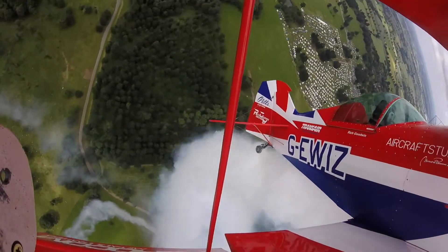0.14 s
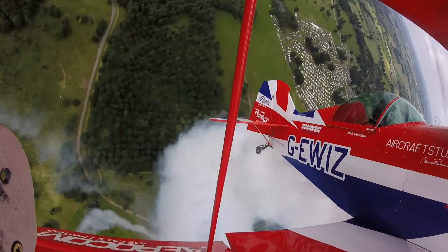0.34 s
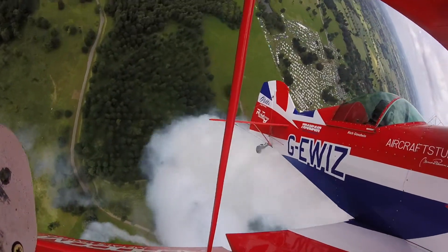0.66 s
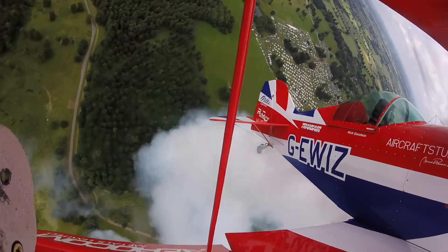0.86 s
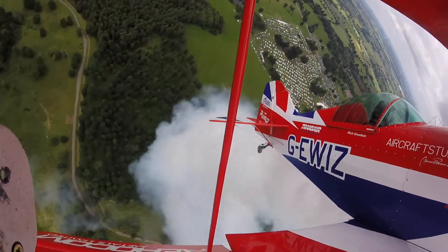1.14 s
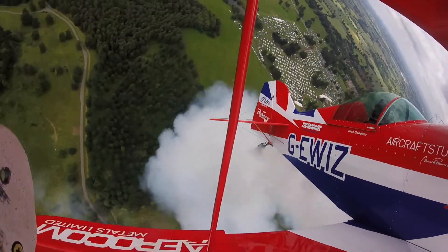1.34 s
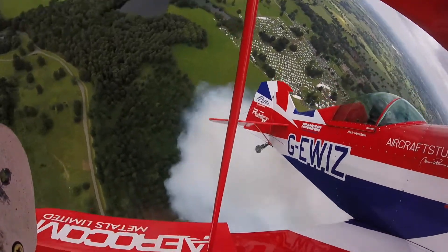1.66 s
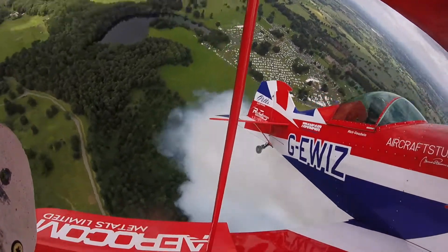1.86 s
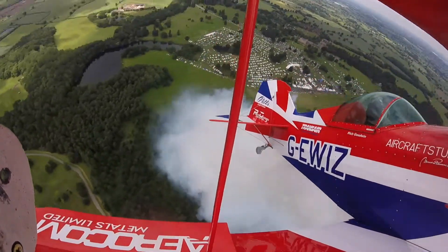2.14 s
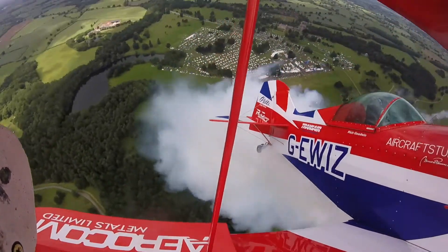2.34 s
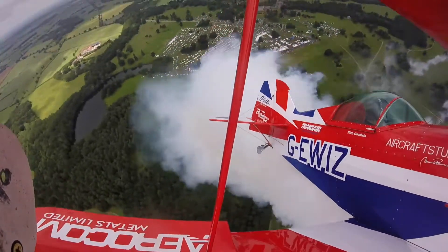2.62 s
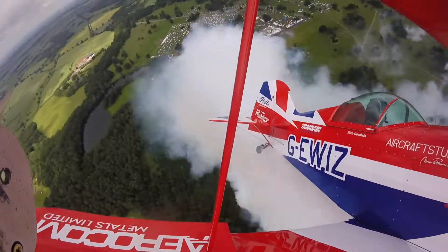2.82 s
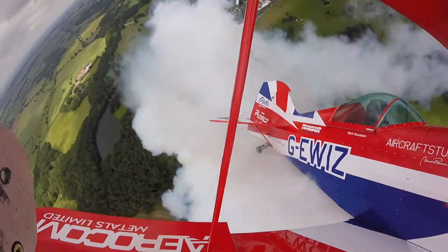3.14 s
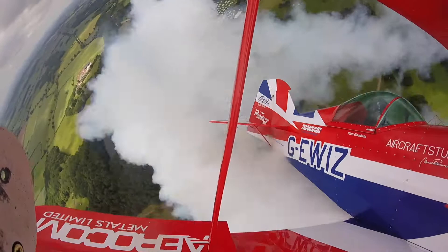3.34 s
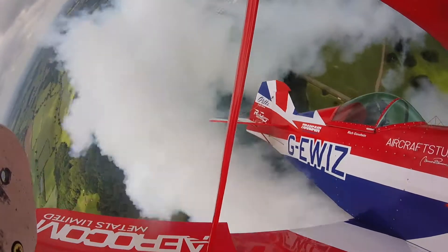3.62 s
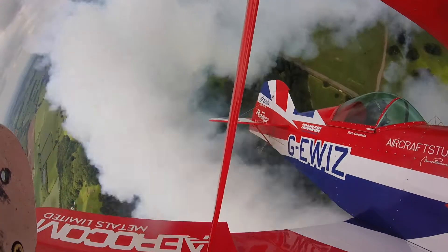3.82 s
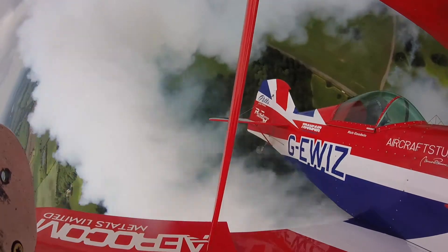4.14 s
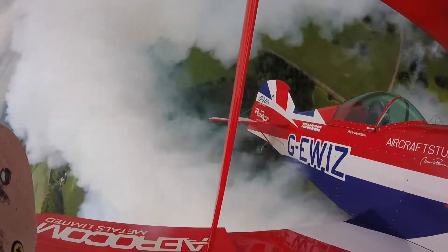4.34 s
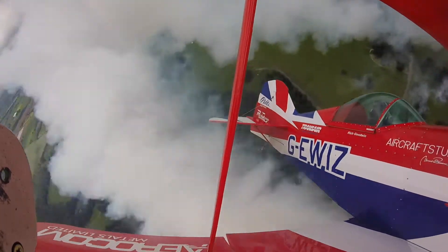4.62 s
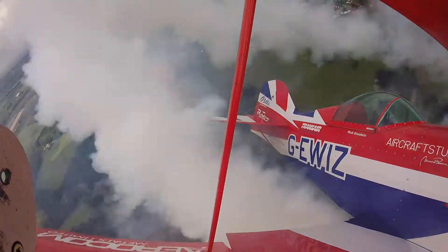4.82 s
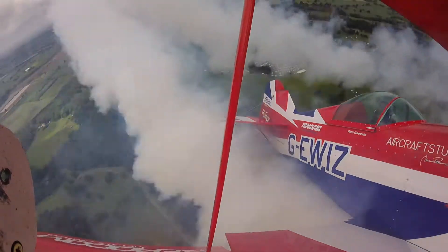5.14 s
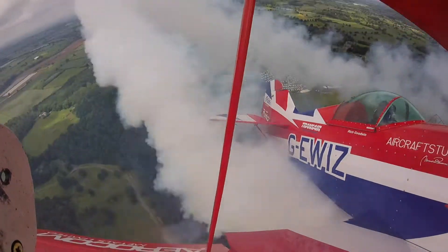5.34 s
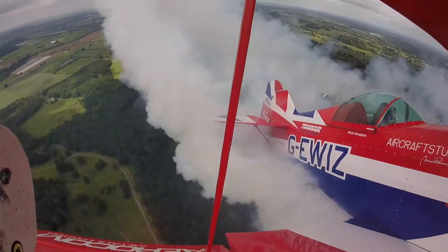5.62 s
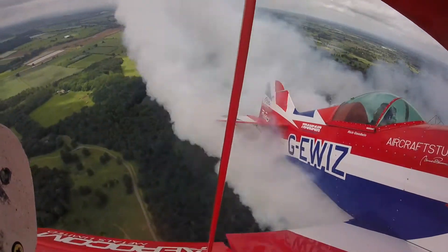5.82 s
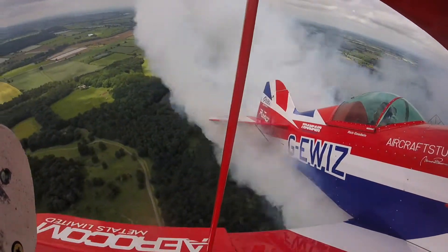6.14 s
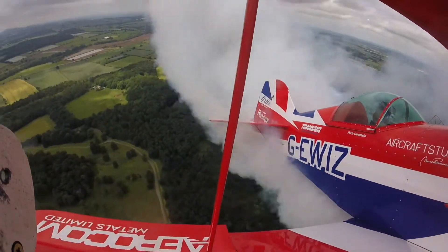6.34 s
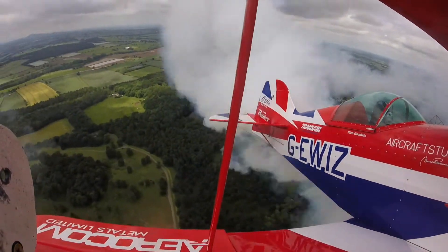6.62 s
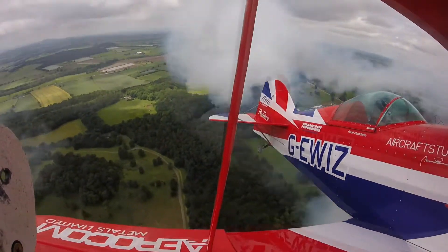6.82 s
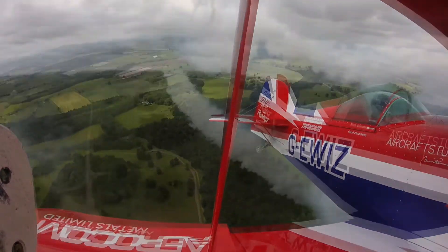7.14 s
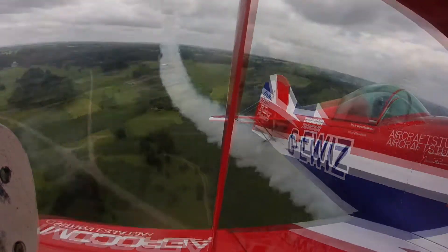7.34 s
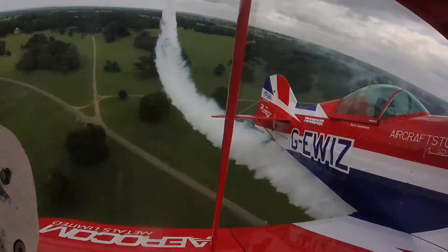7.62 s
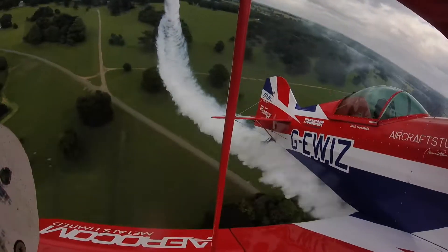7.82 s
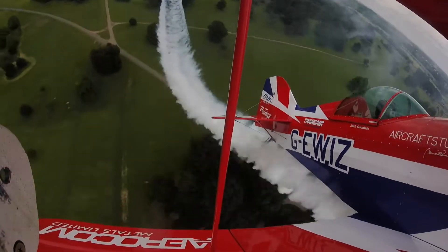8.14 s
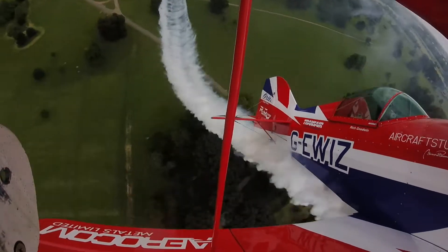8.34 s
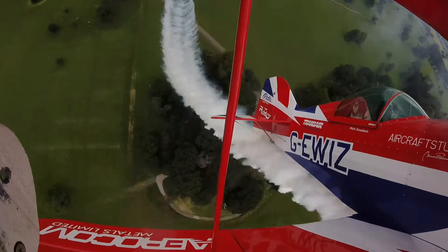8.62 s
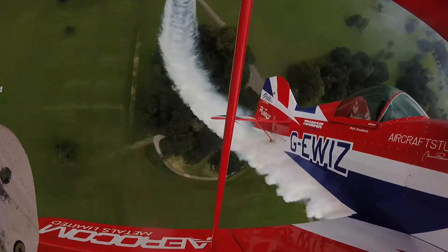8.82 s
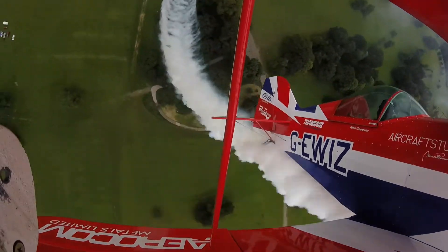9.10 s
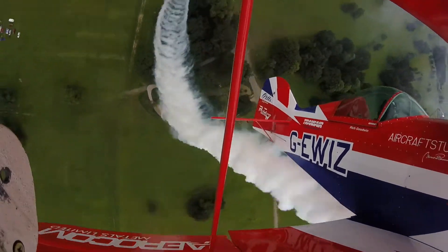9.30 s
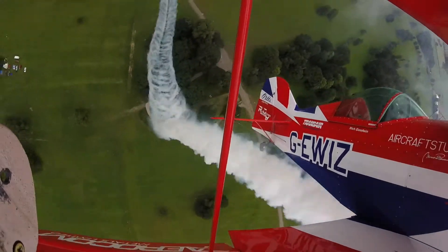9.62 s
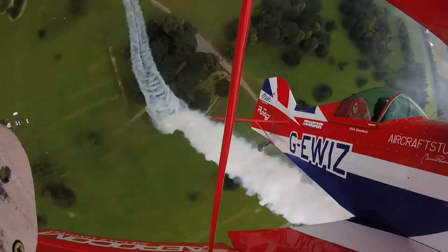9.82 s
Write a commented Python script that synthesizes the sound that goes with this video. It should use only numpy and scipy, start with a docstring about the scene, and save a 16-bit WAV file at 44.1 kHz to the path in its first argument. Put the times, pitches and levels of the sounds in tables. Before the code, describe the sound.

Close, exposed outdoor sound on an airplane's wing: a continuous engine hum near a low C, throbbing bass underneath, and coarse, sputtering wind crackling against the microphone casing. Gusts come irregularly during the tumble, some ending in sharp slaps. Then the plane dives and the airflow smooths into a fuller, steady windy roar with airy hiss, the throb weakening and the engine tone firmer.

```python
"""A six-cylinder engine drones and throbs against a wing's shudder, under gritty rasping bursts of air:
an aerobatic biplane tumbles, heard at a small camera on its wing. Then it dives, and a smooth rush takes over.
The engine is a sum of sines locked to the crank; the wing is two beating low tones, bent, over modal rumble.
The rasp is noise gated at each firing and the rush is steadier noise, both through the camera shell's
resonances. Breathy hiss from the struts, single hard slaps and a thin slipstream are shaped noise too."""
import sys
import numpy as np
from scipy import signal
from scipy.fft import rfft, irfft
from scipy.io import wavfile

SR = 44100
rng = np.random.default_rng(int(sys.argv[2]) if len(sys.argv) > 2 else 0)


def output_pcm(signal):
    """Save a mono or channel-first signal as 16-bit PCM at the path in sys.argv[1].

    Samples are clipped to [-1, 1] before scaling.
    """
    pcm = np.clip(np.atleast_2d(signal).T, -1, 1) * 32767
    wavfile.write(sys.argv[1], SR, np.round(pcm).astype(np.int16))


N = 439677

# Rough and smooth values in these tables are the ends of a blend by the share of smooth airflow.
# Firing rate, three firings to a turn of the crank: (time [s], rate [Hz])
FIRING_RATE = [(0, 132.4), (0.6, 130.9), (3, 131.9), (5.3, 131.3), (5.78, 128.4), (6.6, 132.9), (8, 132.9),
               (9.1, 131.5), (9.9, 134.3)]
# Rms level of the firing tone, before its waver: (time [s], level [dB])
DRONE_LEVEL = [(0, -26.5), (0.75, -31.5), (1.4, -29.5), (2.4, -27), (3.5, -36), (4.15, -28), (6.3, -33),
               (7.1, -35.5), (7.33, -24), (8.8, -27.5), (9.4, -32), (9.9, -23)]
# Overtones of the firing tone: (multiple of the firing rate [1], rough level [dB], smooth level [dB])
OVERTONES = [(2, -47, -44), (3, -44.5, -62), (4, -54, -56), (5, -57.5, -52.5), (7, -58, -61)]
# Overtones that sing out or fade: (time [s], half length [s], multiple of the firing rate [1], change [dB])
OVERTONE_SWELLS = [(0.3, 0.41, 2, 8.5), (2.5, 0.65, 3, 1.5), (3.7, .5, 3, -3.5), (4.403, 0.44, 2, 6),
                   (4.65, 0.51, 4, 11), (5.805, .6, 5, 9), (5.928, 0.29, 2, 12), (9.9, 0.37, 2, -12)]
# Tones between them: (multiple of the two-turn cycle, rounded [1], rough level [dB], smooth level [dB])
CYCLE_TONES = [(1, -65, -55), (2, -32, -34), (4, -42.5, -48), (5, -32, -34.5), (7, -43.5, -50),
               (8, -47.5, -65), (11, -51.5, -44), (14, -60, -52), (17, -70, -70), (20, -65, -53),
               (21, -55.5, -80), (28, -58, -79), (32, -68, -48), (36, -63.5, -64), (50, -62.5, -73),
               (63.5, -52, -58.5)]
# Relative strength of the six firings of a cycle: (level [dB])
CYLINDER_STRENGTH = [1, 0.48, 0.3, -0.3, 0.59, -1.7]
# Force of the air on wing and camera, before gusts: (time [s], relative level [dB])
AIR_FORCE = [(0, -34), (0.85, -36), (1.58, -31), (1.68, -37.5), (2.3, -34.5), (3.3, -35), (3.54, -37),
             (3.9, -32.5), (5.0, -33.5), (5.55, -35.5), (5.9, -30.5), (6.94, -33.5), (7.0, -39),
             (7.42, -30), (8.45, -28.5), (9.35, -29), (9.97, -32)]
# Strong gusts added to that force: (time [s], half length [s], rise [dB])
STRONG_GUSTS = [(0.54, 0.12, 5.5), (0.972, 0.061, 7), (1.982, 0.082, 5.5), (2.436, 0.085, 7),
                (3.037, 0.13, 6), (3.855, 0.035, 4.5), (4.206, .11, 4.5), (4.756, 0.052, 5.5), (5, 0.11, 5),
                (5.322, 0.066, 5.5), (5.47, 0.037, 8), (5.656, 0.017, 6), (6.037, 0.023, 2),
                (6.54, 0.065, 3.5), (8.71, 0.11, 4)]
# Wing and strut modes: (frequency [Hz], width [Hz], relative level [dB])
WING_MODES = [(29, 23, -4), (55, 23, 3), (76, 14, 5), (115.5, 18, 1), (138, 47, -3), (176.5, 58, -7.5),
              (238.2, 35, -5)]
# Strength of the wing's swing: (time [s], relative level [dB])
SWING_STRENGTH = [(0, -15.5), (1.5, -15.5), (3.4, -14), (4.9, -16), (5.4, -18), (6.9, -15.5), (7.4, -27),
                  (9.3, -19.5), (9.97, -23)]
# Overtones of the lopsided swing: (multiple of its phase [1], level against the swing [dB])
SWING_OVERTONES = [(2, -11.5), (3, -27.5), (4, -26.5)]
# Camera shell resonances: (frequency [Hz], width [Hz], level under blasts [dB], level under smooth air [dB])
SHELL_MODES = [(377, 94, -7, -1), (432, 51, -13.5, 5), (526, 70, -8, -2), (694, 180, -13, -2),
               (838, 59, -19.5, -3.5), (928, 138, -14.5, -3.5), (1190, 220, -14, -4.5),
               (1386, 233, -8, 4.5), (1617, 45, -1, -1), (1711, 222, -3, 5), (1970, 370, -7, -1.5),
               (2177, 200, -5.5, -1), (2642, 550, -10, 1), (2875, 190, -4.5, 0.5), (3060, 220, -7, -1),
               (3356, 290, -11.5, 1), (3724, 230, -18, -14.5), (4100, 185, -7, -8), (4270, 570, -13.5, -11),
               (4470, 3600, -46, -15.5), (5536, 350, -13, -12.5), (6170, 610, -9.5, -19.5),
               (6870, 1800, -26, -18), (8205, 840, -22.5, -11.5), (9300, 1530, -29, -25),
               (11240, 2400, -32, -30), (13230, 1320, -37.5, -45), (14700, 1480, -39, -54)]
# Shell zones that rasp on their own:
# (lowest [Hz], highest [Hz], steady hiss between bursts [0-1], spread of grain level [dB])
SHELL_ZONES = [(200, 1100, 1, 2), (1100, 2400, 0.5, 1.5), (2400, 3700, 0.17, 2.5), (3700, 5200, 0.2, 3),
               (5200, 7500, 0.16, 3), (7500, 16000, 0.15, 1.7)]
# Treble of the rasp, to set against its body: (time [s], relative level [dB])
RASP_TREBLE_LEVEL = [(0, -8.5), (4, -6.5), (6.9, -5), (9.97, -1)]
# Treble of the rush, to set against its body: (time [s], relative level [dB])
RUSH_TREBLE_LEVEL = [(7.2, -8), (7.9, -8.5), (9.2, -12.5), (9.97, -9.5)]
# Hiss shed by the struts: (time [s], centre [Hz], rms level [dB])
STRUT_HISS = [(7.0, 3130, -64), (7.3, 3206, -39.5), (8.2, 3310, -40.5), (8.7, 3700, -39.5),
              (9.3, 3770, -34), (9.52, 3340, -45), (9.97, 2690, -61)]
# Hard slaps of air on the shell: (time [s], noise level before the envelope [dB], centre [Hz])
AIR_SLAPS = [(1.258, -25, 2600), (3.438, -25.5, 5930), (4.666, -20.5, 2940), (5.125, -23.5, 2900),
             (5.313, -18.5, 2000)]

# Share of smooth airflow: before the dive and once it has set in [0-1]; start and length of the change
TUMBLE_SHARE, DIVE_SHARE, DIVE_S, DIVE_ONSET_S = 0.13, 0.92, 7.0, 0.28
EASE_S, EASE_PER_S = 9.67, 0.27  # the share falls again: from when, and how fast
EDDIES_PER_S, EDDY_ROUGH_DB, EDDY_SMOOTH_DB = 17, 1.83, 0.94  # small eddies between the gusts
SHUDDER_HZ, SHUDDER_WANDER_HZ = 59.58, 2.1
BUFFET_ROUGH_DB, BUFFET_SMOOTH_DB = 1, -3.5  # wing rumble against the force of the air
BURST_RISE, BURST_FALL = 0.19, 0.46  # time constants, as shares of the time between firings
SLAP_RISE_S, SLAP_DECAY_S = 0.0008, 0.006  # time constants
TREBLE_HZ = 3800  # boundary between body and treble of the air noises
CEILING, TOP_HZ = 0.7, 15350  # highest amplitude that saturation allows; upper band limit


def undb(db):
    """Amplitude ratio is ten to the power of decibels over twenty."""
    return 10 ** (np.asarray(db) / 20)


def unit(x):
    """Normalization: divide by the root mean square."""
    return x / np.sqrt(np.mean(x ** 2))


def curves(table):
    """Linear interpolation of each column of a timed table."""
    s, *columns = np.transpose(table)
    return [np.interp(np.arange(N) / SR, s, column) for column in columns]


def walk(rate):
    """Band-limited chance: `rate` normal values a second, joined by cosine easing."""
    values = rng.standard_normal(4096)
    position = np.arange(N) / SR * rate
    i = position.astype(int)
    ease = (1 - np.cos(np.pi * (position - i))) / 2
    return values[i % len(values)] * (1 - ease) + values[(i + 1) % len(values)] * ease


def blend(rough, smooth, airflow):
    """Linear mixing from the rough-air to the smooth-air value by the share of smooth airflow."""
    return rough + (smooth - rough) * airflow


def swell(s, half_length):
    """Gaussian pulse, 1 at its crest and 1/e at one half length to either side."""
    return np.exp(-((np.arange(N) / SR - s) / half_length) ** 2)


def resonate(x, hz, width, db):
    """Modal resonance: summed power peaks, made causal as a minimum-phase filter."""
    size = 2 ** 14
    f = np.maximum(np.fft.rfftfreq(size, 1 / SR), 1)
    power = 0
    for h, w, d in zip(hz, width, db):
        detuning = (f / h - h / f) * h / w
        power = power + undb(d) ** 2 / (1 + detuning ** 2) ** 2
    # folding the cepstrum onto positive time gives the minimum phase
    cepstrum = irfft(np.log(power + 1e-12) / 2)
    cepstrum[1:size // 2] *= 2
    cepstrum[size // 2 + 1:] = 0
    impulse = irfft(np.exp(rfft(cepstrum)))
    return signal.oaconvolve(x, impulse)[:N]


def brighten(x, treble_db, body_db):
    """Spectral balance: split an air noise in two bands and set the level of each."""
    body = signal.sosfiltfilt(signal.butter(4, TREBLE_HZ, fs=SR, output="sos"), x)
    treble = x - body
    return undb(body_db) * unit(body) + undb(treble_db) * unit(treble)


def smooth_share():
    """Flow regime: the smooth share is small in the tumble, high in the dive, then eases."""
    t = np.arange(N) / SR
    dive = np.clip((t - DIVE_S) / DIVE_ONSET_S, 0, 1)
    ease = EASE_PER_S * np.maximum(t - EASE_S, 0)
    return np.clip(blend(TUMBLE_SHARE, DIVE_SHARE, dive) - ease, 0, 1)


def gusts(airflow):
    """Turbulence: strong gusts, and small eddies that weaken in smooth air, in dB of force."""
    spread_db = blend(EDDY_ROUGH_DB, EDDY_SMOOTH_DB, airflow)
    eddies_db = spread_db * 2 * np.tanh(walk(EDDIES_PER_S) / 2)
    return eddies_db + sum(db * swell(s, length) for s, length, db in STRONG_GUSTS)


def slipstream(hiss_db=-63.5, hz=10500, width_hz=5200):
    """Steady flow noise: a thin, even hiss in one broad band."""
    return undb(hiss_db) * unit(resonate(rng.standard_normal(N), [hz], [width_hz], [0]))


def slaps():
    """Impulsive excitation: band noise that sets in abruptly and decays exponentially."""
    out = 0
    for s, db, hz in AIR_SLAPS:
        age = np.maximum(np.arange(N) / SR - s, 0)
        noise = unit(resonate(rng.standard_normal(N), [hz], [hz / 4], [0]))
        envelope = (1 - np.exp(-(age / SLAP_RISE_S) ** 2)) * np.exp(-age / SLAP_DECAY_S)
        out = out + undb(db) * noise * envelope
    return out


def struts(half_width_hz=330):
    """Eddy shedding: slow noise modulates a moving carrier into a broad, breathy band."""
    hz, db = curves(STRUT_HISS)
    lowpass = signal.butter(3, half_width_hz, fs=SR, output="sos")
    eddies = signal.sosfilt(lowpass, rng.standard_normal((2, N)))
    angle = 2 * np.pi * np.cumsum(hz) / SR
    return undb(db) * unit(eddies[0] * np.cos(angle) + eddies[1] * np.sin(angle))


def rush(cycle, flutter_db=1.0, chop=0.08):
    """Flow over a resonant shell: even noise, lightly chopped by the propeller at the firing rate."""
    propeller = 1 + chop * np.sin(2 * np.pi * len(CYLINDER_STRENGTH) * cycle)
    pressure = undb(flutter_db * walk(70)) * propeller
    hz, width, _, db = np.transpose(SHELL_MODES)
    return resonate(rng.standard_normal(N) * pressure, hz, width, db)


def rasp(cycle, scatter_db=1.85, own_scatter_db=1.4, flutter_db=1.14, grain=32):
    """Pulsed excitation: each firing drives the shell's zones with a burst of gritty noise."""
    firing = cycle * len(CYLINDER_STRENGTH)
    index, phase = firing.astype(int), firing % 1
    count = index[-1] + 1
    strength_db = np.take(CYLINDER_STRENGTH, index % len(CYLINDER_STRENGTH))
    size_db = strength_db + scatter_db * rng.standard_normal(count)[index]
    burst = unit((1 - np.exp(-(phase / BURST_RISE) ** 2)) * np.exp(-phase / BURST_FALL))
    hz, width, db, _ = np.transpose(SHELL_MODES)
    out = 0
    for low_hz, high_hz, between, grain_db in SHELL_ZONES:
        # a new random level every few samples makes the noise gritty
        grain_gain = undb(grain_db * rng.standard_normal(N // grain + 1))
        grit = rng.standard_normal(N) * np.repeat(grain_gain, grain)[:N]
        size = undb(size_db + own_scatter_db * rng.standard_normal(count)[index])
        drive = unit(grit * (between + burst * size) * undb(flutter_db * walk(40)))
        zone = (hz >= low_hz) & (hz < high_hz)
        out = out + resonate(drive, hz[zone], width[zone], db[zone])
    return out


def wing(cycle, airflow, force_db, shudder_db=-4.0, bank_db=-9.5, waver_db=1.15):
    """Beating: the shudder lies just under one cylinder bank's pulse; turbulence rumbles in the modes."""
    bank = np.exp(1j * np.pi * len(CYLINDER_STRENGTH) * cycle)  # half the firing rate
    shudder_hz = SHUDDER_HZ + SHUDDER_WANDER_HZ * walk(14)
    shudder = np.exp(2j * np.pi * np.cumsum(shudder_hz) / SR)
    strength = undb(curves(SWING_STRENGTH)[0] + waver_db * walk(32))
    swing = strength * (undb(shudder_db) * shudder + undb(bank_db) * bank)
    # the wing gives more one way than the other: flat crests and sharp troughs
    angle = np.angle(swing)
    overtones = sum(undb(db) * np.cos(round(k) * angle) for k, db in SWING_OVERTONES)
    throb = -np.abs(swing) * (np.cos(angle) + overtones)
    rumble = unit(resonate(rng.standard_normal(N), *np.transpose(WING_MODES)))
    buffet_db = force_db + blend(BUFFET_ROUGH_DB, BUFFET_SMOOTH_DB, airflow)
    return throb + undb(buffet_db) * rumble


def engine(cycle, airflow, waver_db=3.5, wobble_rad=0.36, drone_waver_db=2.5,
           overtone_waver_db=1.0, overtone_wobble_rad=0.083, smooth_wobble_rad=1.0):
    """Harmonic series: the firing tone, its overtones, and weaker tones left by unequal cylinders."""
    firing = 2 * np.pi * len(CYLINDER_STRENGTH) * cycle
    drone_db = curves(DRONE_LEVEL)[0] + drone_waver_db * (1 - airflow / 2) * walk(9)
    out = undb(drone_db) * np.sin(firing + 0.11 * walk(27))
    overtone_wobble = blend(overtone_wobble_rad, smooth_wobble_rad, airflow)
    for k, rough_db, smooth_db in OVERTONES:
        swell_db = sum(change * swell(s, length) for s, length, which, change in OVERTONE_SWELLS
                       if round(which) == round(k))
        db = blend(rough_db, smooth_db, airflow) + swell_db + overtone_waver_db * walk(12)
        out = out + undb(db) * np.sin(round(k) * firing + overtone_wobble * walk(22))
    wobble = blend(wobble_rad, smooth_wobble_rad, airflow)
    for multiple, rough_db, smooth_db in CYCLE_TONES:
        db = blend(rough_db, smooth_db, airflow) + waver_db * walk(7)
        angle = 2 * np.pi * (round(multiple) * cycle + rng.random())
        out = out + undb(db) * np.sin(angle + wobble * walk(25))
    return np.sqrt(2) * out  # turns rms levels into sine amplitudes


def scene():
    """Superposition: engine, wing, rasp and rush share one crank; the same gusts hit wing and camera."""
    firing_hz = curves(FIRING_RATE)[0] + 0.087 * walk(12)
    cycle = np.cumsum(firing_hz) / SR / len(CYLINDER_STRENGTH)  # count of two-turn cycles
    airflow = smooth_share()
    force_db = curves(AIR_FORCE)[0] + gusts(airflow)
    pulsed = brighten(rasp(cycle), curves(RASP_TREBLE_LEVEL)[0], body_db=-0.53)
    smooth = brighten(rush(cycle), curves(RUSH_TREBLE_LEVEL)[0], body_db=1.85)
    # square roots share out the power between the two noises
    air = undb(force_db) * (np.sqrt(1 - airflow) * pulsed + np.sqrt(airflow) * smooth)
    background = slipstream() + slaps() + struts()
    return (background + air + wing(cycle, airflow, force_db) + engine(cycle, airflow))[None]


def record(dry):
    """Saturation and band limiting: the camera rounds the highest peaks and cuts the top."""
    rounded = CEILING * np.tanh(dry / CEILING)
    return signal.sosfilt(signal.ellip(10, 0.2, 80, TOP_HZ, fs=SR, output="sos"), rounded)


dry = scene()
out = record(dry)
output_pcm(out)
```